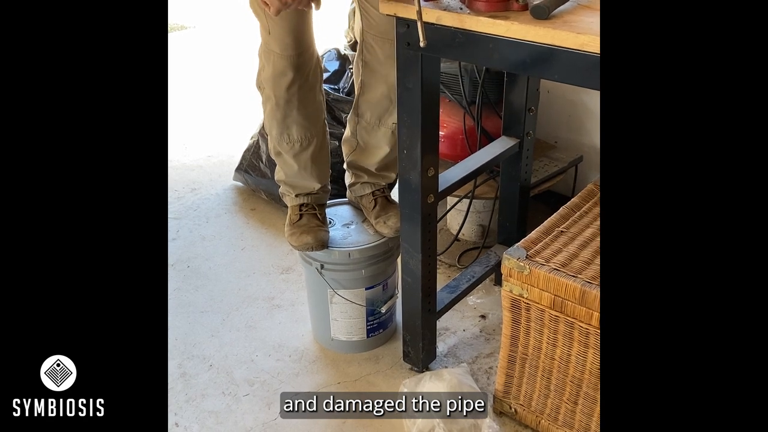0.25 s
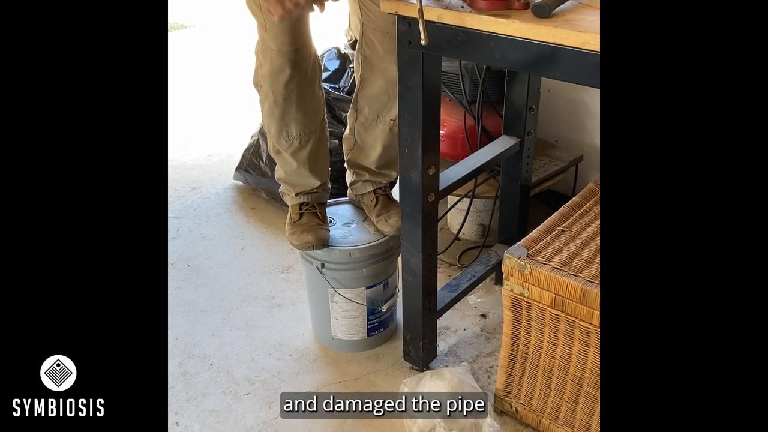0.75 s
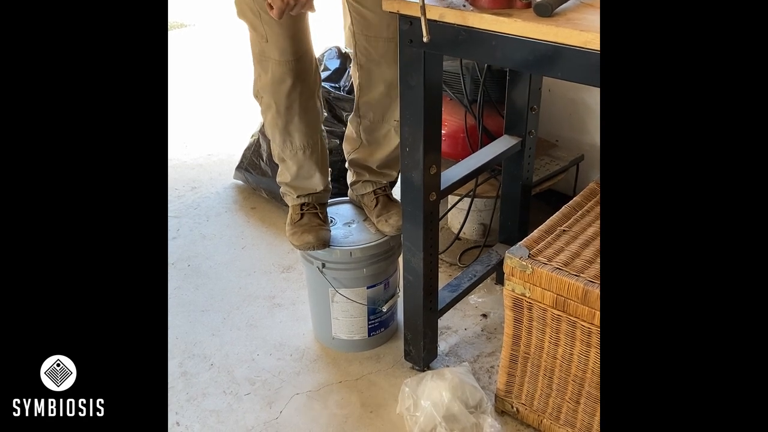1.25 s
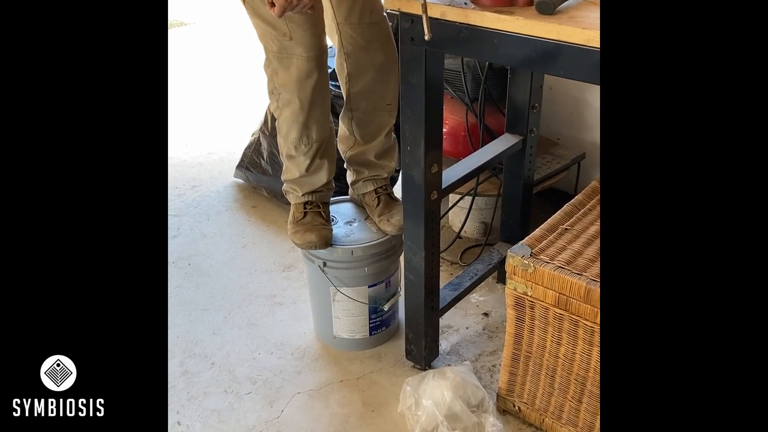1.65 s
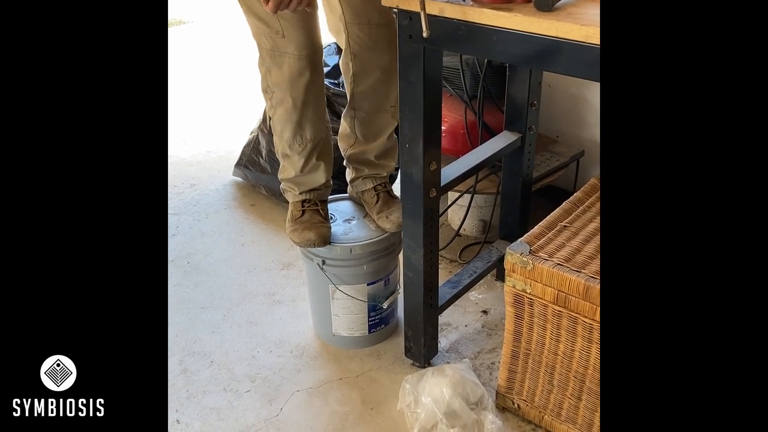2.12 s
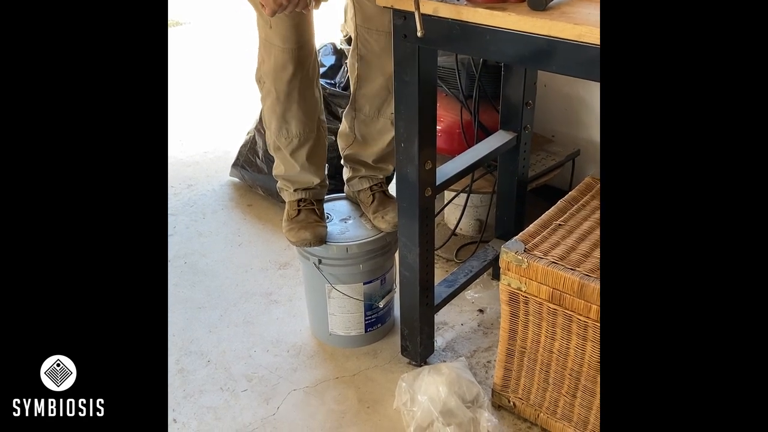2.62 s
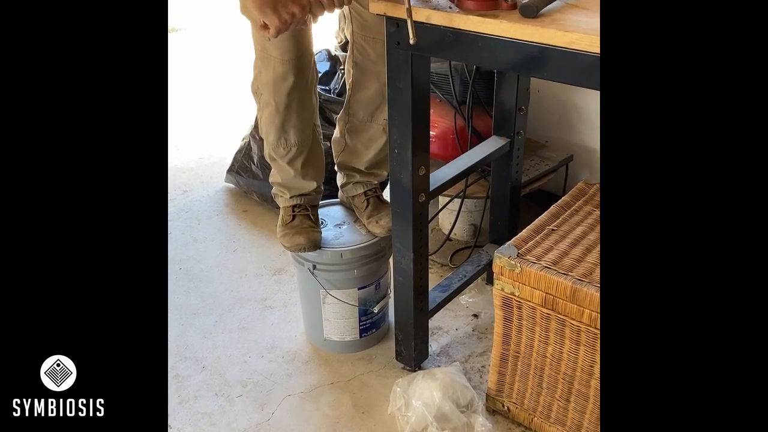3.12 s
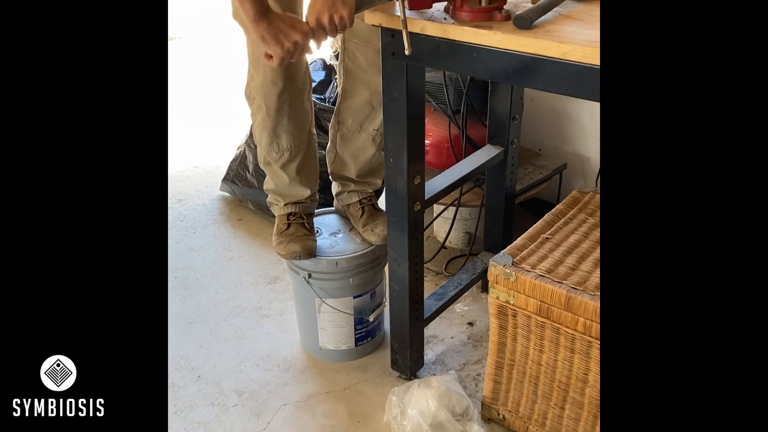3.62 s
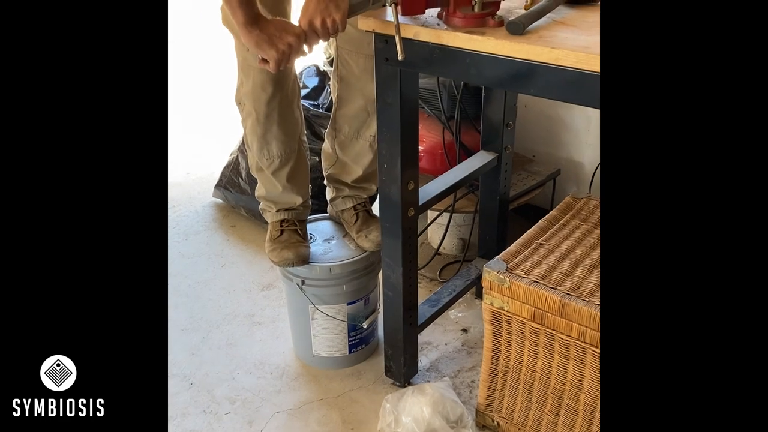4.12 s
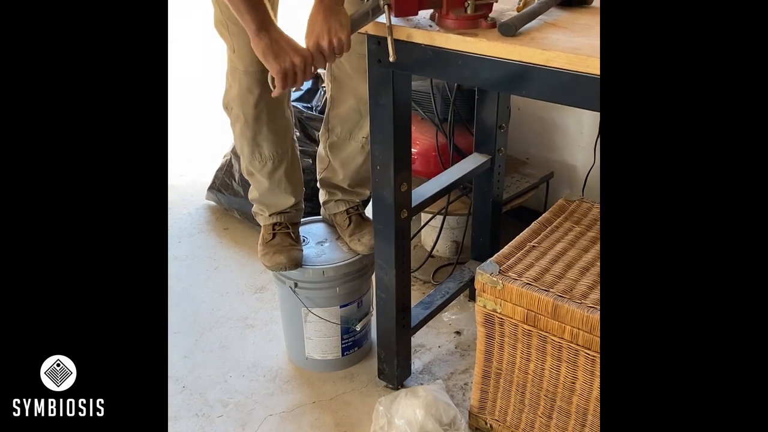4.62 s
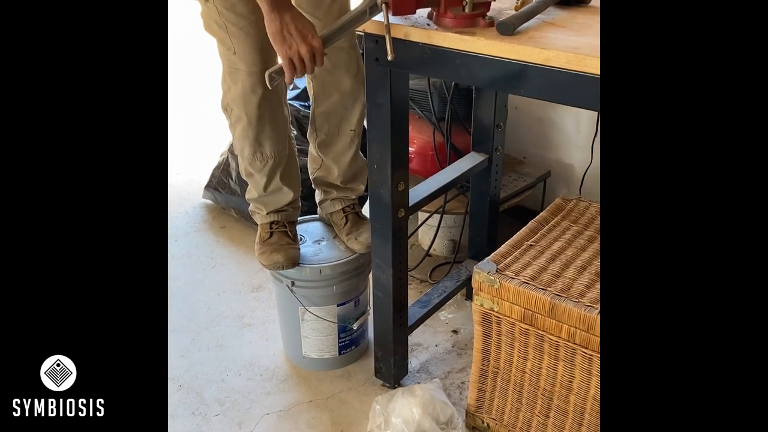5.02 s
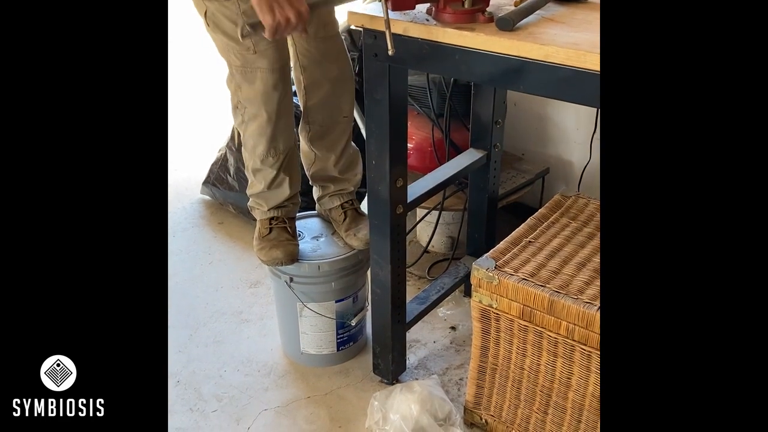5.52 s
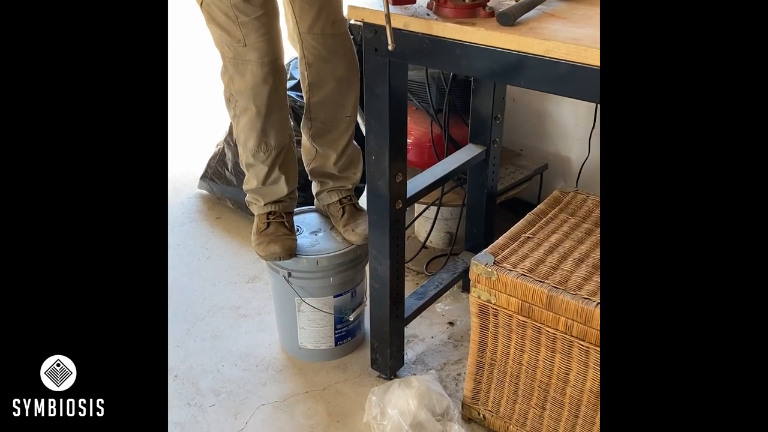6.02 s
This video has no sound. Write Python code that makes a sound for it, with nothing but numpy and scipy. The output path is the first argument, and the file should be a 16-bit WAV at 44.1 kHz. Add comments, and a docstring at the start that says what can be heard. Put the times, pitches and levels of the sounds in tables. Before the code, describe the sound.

A long wrench strains steel pipe fittings clamped to a workbench in a hard-walled garage, heard by a nearby two-microphone phone. From 0.1 s come soft knocks and rattles, growing to sharper clanks at 0.8 and 1.0 s with dull bench thuds. After 1.2 s a scrape fades into near quiet, just hiss and sparse thin high pings. A loose fitting clinks lightly at 2.3 s. Knocks return from 2.7 s, a firm one at 2.95, with gritty scraping around 3.15 and 3.7 s. At 4.3 s one hard, bright bang with a bench thud dominates, followed by a strong clank at 4.5 and heavy scraping, ticking and rumble around 4.7 s. It eases near 5 s; a loud rattling double knock hits at 5.42 s. Smaller knocks, a scrape and a high ping follow; three tiny steel chinks end it around 6.2 s. Tails are short and roomy.

```python
"""In a hard-walled garage a long wrench strains steel pipe fittings clamped to a workbench.
Each slip knocks and rattles the steel: noise under a crack and a lumpy fade, and steel modes rung by it.
The bench thuds from pushes and rough force on its modes; snaps, pings, chinks and a clink are dying sines.
The strain makes patchy scraping, rumble and small ticks, over hiss; sparse taps give the room's tail,
and a phone with two microphones listens."""
import sys
import numpy as np
from scipy import signal
from scipy.fft import rfft, irfft
from scipy.io import wavfile
from scipy.ndimage import uniform_filter1d

SR = 44100
rng = np.random.default_rng(int(sys.argv[2]) if len(sys.argv) > 2 else 0)


def dump(signal):
    """Clip the signal to [-1, 1] and save it as 16-bit WAV at the path in sys.argv[1]."""
    limited = np.clip(np.atleast_2d(signal).T, -1, 1)
    pcm = np.round(limited * 32767).astype(np.int16)
    wavfile.write(sys.argv[1], SR, pcm)


def ratio(d):
    """dB to gain"""
    e = np.asarray(d, float) / 20
    return 10 ** e


N = 275756  # length in samples


def evened(x):
    """Scales to rms 1."""
    return x / np.sqrt(np.mean(x ** 2) + 1e-20)


def read(points, hz):
    """Joins points on a log-frequency axis."""
    f, value = np.transpose(points)
    return np.interp(np.log(hz + 1), np.log(f + 1), value)


def add(mix, s, sound):
    """Mixes a sound in at time s, cut off at the end of the mix."""
    part = mix[..., round(s * SR):][..., :sound.shape[-1]]
    part += sound[..., :part.shape[-1]]


def coloured(x, points):
    """Gives x a spectrum."""
    gain = ratio(read(points, np.fft.rfftfreq(x.shape[-1], 1 / SR)))
    return irfft(rfft(x) * gain, x.shape[-1])


def smoothed(x, size):
    """Runs a moving average twice along the last axis."""
    return uniform_filter1d(uniform_filter1d(x, size), size)


def ring(modes, seconds):
    """The sum of dying sines; modes are (f/Hz, level/dB, t60/s)."""
    t = np.arange(round(seconds * SR)) / SR
    return sum(ratio(db - 60 * t / t60) * np.sin(2 * np.pi * hz * t) for hz, db, t60 in modes)


# spectrum of the chatter: [f/Hz, relative level/dB per Hz]
CHATTER_COLOUR = [(120, -29), (200, 2.5), (323, -35.5), (513, -9), (728, -4), (1050, -4.5), (1130, -9.5),
                  (1550, -10), (4450, -27), (5450, -30.5), (5980, -22), (10600, -18), (11600, -34.5),
                  (15600, -27.5), (16500, -54)]
# the strength, body, edge and rattle bands of a knock: [low f/Hz, high f/Hz]
BAND_EDGES = [(700, 2500), (300, 700), (2500, 6000), (6000, 20000)]


def chatter():
    """Unit drive in four bands, and the uneven pressure with which loose parts touch again and again."""
    impacts = rng.standard_normal(N) * ratio(2.0 * np.minimum(rng.exponential(1, N), 4))
    plain = coloured(impacts, CHATTER_COLOUR)
    bands = [signal.butter(2, edge, "band", fs=SR, output="sos") for edge in BAND_EDGES]
    drives = [evened(signal.sosfilt(band, plain)) for band in bands]
    lumps = smoothed(rng.standard_normal((5, N)), 250)
    touch = ratio(3.5 * evened(lumps[:4] + .8 * lumps[4]))  # the fifth lump is common to all bands
    return drives, evened(impacts), bands, evened(touch)


# slips: [t/s, strength level/dB in 0.7-2.5 kHz, body level/dB over it in 0.3-0.7 kHz,
# rattle level/dB over it above 6 kHz, chatter t60/s before the band's own factor]
KNOCKS = [(0.096, -54.5, 3, -7.5, 0.19), (0.162, -55.5, 14, -28, 0.066), (0.219, -32.5, -13, -8.5, 0.086),
          (0.354, -32.5, -9, -27, 0.14), (0.409, -47, -1, -7, 0.34), (0.723, -45, -3, -0.5, 0.075),
          (0.744, -38.5, -1.5, -9, 0.26), (0.799, -28.5, -9, -5.5, 0.045), (1.008, -21, -16.5, -7.5, 0.094),
          (1.059, -39.5, -12, -29, 0.14), (1.146, -40.5, -8, -4, 0.27), (1.185, -33.5, -10.5, -10, 0.088),
          (2.331, -37.5, -3.5, -1, 0.027), (2.725, -40.5, -10.5, -2, 0.3), (2.768, -47, 8.5, -12, 0.14),
          (2.957, -26, -13.5, -20, 0.092), (3.047, -32.5, -13, -10.5, 0.075), (3.109, -46, -8, -2.5, 0.18),
          (3.357, -46, -5.5, -41, 0.12), (3.39, -40, 3, -10.5, 0.15), (3.556, -34.5, -15.5, 0, 0.067),
          (3.644, -28, -21, -7.5, 0.14), (3.7, -45, -23, -24, 0.11), (3.807, -37.5, -2.5, -9, 0.12),
          (3.901, -43, -12, -16, 0.035), (4.084, -45, -12, -54, 0.056), (4.248, -35, -4, -10, 0.31),
          (4.313, -3.5, 0.5, -12, 0.053), (4.393, -35, -7, 11, 0.12), (4.494, -19, -5.5, -15, 0.083),
          (4.547, -28.5, -18.5, -8.5, 0.029), (4.661, -25, -10.5, -22.5, 0.069),
          (4.778, -30, -8, -6.5, 0.092), (4.847, -30, -24.5, -33, 0.074), (5.156, -49.5, -10, -12.5, 0.17),
          (5.249, -48.5, -7.5, -29.5, 0.11), (5.389, -40.5, -3.5, -8, 0.15), (5.411, -30, 0, 0.5, 0.073),
          (5.418, -17, 0, 2.5, 0.087), (5.483, -28, -14, -1, 0.025), (5.493, -34.5, 5, 9.5, 0.058),
          (5.667, -37.5, 2.5, -4, 0.11), (5.783, -39, -22, -22, .08), (5.841, -51.5, 4.5, -27, 0.35),
          (5.959, -27.5, 2, -15, 0.13)]
# modes of pipe, wrench and vice: [f/Hz, nominal width/Hz, level/dB]
STEEL = [(364, 110, 4), (412.3, 54, -18.5), (478, 55, -1), (637, 55, -4), (809, 20, -10), (849, 50, 6),
         (1051, 35, 2.5), (1211, 31, -3.5), (1400, 50, -2), (1596, 46, 4), (1720, 55, -4), (1941, 26, -7),
         (2354, 60, -2.5), (2672, 58, -6), (3012, 30, -2.5), (3347, 23, 1.5), (3556, 61, -9.5),
         (4470, 29, -4), (4893, 53, -6.5), (5094, 69, -9.5), (6900, 53, -3), (7680, 56, 4.5),
         (8350, 61, -1), (8290, 50, -21), (8760, 70, -0.5), (9000, 180, 0), (10564, 17, -3.5)]
# how each band answers: [rise/s, crack level/dB over the chatter, crack t60/s,
# ring level/dB over the force, factor on the chatter t60]
BANDS = [(0.0046, -12, 0.018, 0, 1.108), (0.011, -7.5, 0.039, 1, 1.25), (0.0035, 4, 0.016, -3, 0.88),
         (0.0025, 6.5, 0.031, -7.5, 0.65)]


def knocks():
    """Each slip is a crack and a dying, lumpy chatter that strikes the steel at its own spot."""
    drives, impacts, bands, touch = chatter()
    t, out = np.arange(SR // 3) / SR, np.zeros(N)
    edge_db, edge_share = -4, 0.4  # 2.5-6 kHz lies under the strength and takes this share of the rattle
    spread_db, detune, least_hz = 3.5, 0.021, 95  # least_hz: no mode is narrower
    spots = rng.standard_normal((len(KNOCKS), 2, len(STEEL)))
    for (s, db, body_db, rattle_db, t60), (weight, shift) in zip(KNOCKS, spots):
        levels_db = db + np.array([0, body_db, edge_db + edge_share * rattle_db, rattle_db])
        # the spot and the grip of the hand weight and detune the modes
        modes = [(hz * (1 + detune * d), mode_db + spread_db * w, 2.16 / max(width, least_hz))
                 for (hz, width, mode_db), w, d in zip(STEEL, weight, shift)]
        steel = ring(modes, .2)
        start = round(s * SR) - 30
        here = slice(start, start + len(t))
        u = t[:len(impacts[here])]
        for k, (rise_s, crack_db, crack_t60, ring_db, stretch) in enumerate(BANDS):
            smooth = ratio(-60 * u / (t60 * stretch))
            lumpy = touch[k][here] * smooth
            lumpy *= np.linalg.norm(smooth) / np.linalg.norm(lumpy)  # same energy, unevenly spent
            fall = ratio(crack_db - 60 * u / crack_t60) + lumpy
            force = ratio(levels_db[k]) * fall * (1 - np.exp(-u / rise_s))
            rung = signal.fftconvolve(force * impacts[here], signal.sosfilt(bands[k], steel))
            add(out, start / SR, force * drives[k][here])
            add(out, start / SR, ratio(ring_db) * np.linalg.norm(force) * rung / np.linalg.norm(rung))
    return out


# short pitched snaps within some knocks: [t/s, level/dB before the soft onset, f/Hz]
SNAPS = [(0.217, -30, 1070), (0.36, -27, 878), (0.726, -27, 848), (1.005, -19.5, 950), (2.961, -25, 960),
         (3.645, -23, 1225), (4.312, -13.5, 1027), (4.313, -10.5, 2045), (4.395, -22.5, 5400),
         (4.493, -18, 1050), (4.666, -19.5, 1400), (4.848, -26, 874), (5.421, -12.5, 1380),
         (5.422, -17, 5405)]


def snaps():
    """Single dying sines with a soft onset; higher pitches die sooner."""
    out = np.zeros(N)
    seconds = (SR // 3) / SR
    rise = 1 - np.exp(-np.arange(SR // 3) / SR / 0.0011)
    for s, db, hz in SNAPS:
        t60 = 0.04 * (1000 / hz) ** 0.4  # 0.04 s at 1 kHz
        add(out, s - .001, rise * ring([(hz, db, t60)], seconds))
    return out


# the long pipe's hum: [f/Hz, level/dB, t60/s]
PIPE = [(637, -74, 1.6)]


def pipe_hum(hits):
    """The long pipe hums on faintly, a slow mode rung by the hits."""
    return signal.oaconvolve(hits, ring(PIPE, 1.5))[:N]


# bench thuds: [t/s, relative top level/dB in 130-300 Hz, legs level/dB over it in 50-130 Hz]
THUDS = [(0.118, -55, -22), (0.155, -34, -12), (0.308, -44.5, -22), (0.373, -40.5, 2), (0.467, -40, -14.5),
         (0.748, -32, -7), (0.888, -43, -20.5), (1.016, -31, -1.5), (1.137, -40, 2.5), (1.248, -46.5, 1),
         (2.336, -59, -19), (2.768, -35.5, -6), (2.967, -40, 4), (3.085, -45, 4), (3.391, -33.5, -7),
         (3.656, -42, 9), (3.794, -36.5, 7), (3.848, -42, 1.5), (4.264, -32.5, -15), (4.312, -16, -8.5),
         (4.488, -32.5, 5), (4.541, -38, -2.5), (4.672, -34.5, -1.5), (4.748, -37.5, 8), (4.864, -39, -2.5),
         (5.159, -56, -22), (5.429, -19, -9), (5.501, -30.5, -9), (5.681, -35, -30), (5.78, -42, -10),
         (5.9, -43, -26), (5.965, -40.5, -21)]
# bench modes, first two the legs, the rest the top: [f/Hz, level/dB, t60/s before the slow swell]
BENCH = [(76.5, -3.5, 0.062), (88.6, -7, 0.16), (148.4, -4, 0.049), (193.6, 9, 0.045), (245, -10.5, 0.049),
         (295, -2.5, 0.064)]


def thuds():
    """The bench shakes after a knock: a push and a burst of rough force ring its top and its legs."""
    t, (force, blows) = np.arange(SR // 2) / SR, np.zeros((2, 2, N))
    push = np.hanning(round(0.0027 * SR))  # 2.7 ms
    push_db, rough_db = np.array([[-11], [-16]]), -0.5  # push on top and legs; rough force
    shake = ratio(-60 * t / 0.13) * (1 - np.exp(-t / 0.0065))
    for s, db, legs_db in THUDS:
        both_db = db + np.array([[0], [legs_db]])
        add(force, s - .006, ratio(both_db) * shake)
        add(blows, s, ratio(push_db + both_db) * push)
    soft = signal.butter(2, 420, fs=SR, output="sos")
    bodies = signal.sosfilt(soft, [ring(BENCH[2:], .4), ring(BENCH[:2], .4)])
    bodies *= (1 - np.exp(-t[:bodies.shape[1]] / 0.0054)) ** 2  # the heavy bench is slow to answer
    bodies /= np.linalg.norm(bodies, axis=1, keepdims=True)
    drive = blows + ratio(rough_db) * force * rng.standard_normal((2, N))
    return ratio(3.0) * signal.oaconvolve(drive, bodies, axes=1)[:, :N].sum(0)


def onset():
    """A 0.4 s gain that rises softly with a 1 ms time constant."""
    return 1 - np.exp(-np.arange(round(.4 * SR)) / SR / .001)


# high pings: [t/s, level/dB before the soft onset, f/Hz]
PINGS = [(0.029, -40, 15600), (0.223, -50, 15600), (0.411, -46, 15400), (0.519, -40, 15670),
         (0.693, -41, 15770), (0.798, -42, 14800), (1.302, -43, 15200), (1.73, -47.5, 15800),
         (2.331, -49, 15500), (2.485, -43.5, 15940), (2.725, -39, 15100), (2.806, -45, 15700),
         (2.907, -33.5, 15800), (3.132, -48, 15600), (3.282, -33, 15800), (3.555, -43, 14900),
         (3.673, -49, 15400), (3.805, -37, 15850), (4.016, -38, 15800), (4.19, -38.5, 15700),
         (4.298, -41, 16000), (4.393, -49, 15000), (4.684, -41, 15700), (4.909, -38, 15400),
         (5.083, -35, 15470), (5.396, -39, 15900), (5.494, -40, 15200), (5.711, -23, 16000)]


def pings():
    """Thin high pings, each a single dying sine."""
    out = np.zeros(N)
    for s, db, hz in PINGS:
        add(out, s, onset() * ring([(hz, db, 0.16)], .4))
    return out


# a small steel piece chinks at the end: [t/s, level/dB over its modes]
CHINKS = [(6.184, -50), (6.216, -51.5), (6.243, -52)]
# modes of the piece: [f/Hz, level/dB, t60/s]
PIECE = [(4220, -3, 0.09), (4300, -0.5, 0.13), (6050, -11.5, 0.097), (8020, -0.5, 0.075)]


def chinks():
    """A small piece rings with the same modes at every chink."""
    out = np.zeros(N)
    for s, db in CHINKS:
        add(out, s, ratio(db) * onset() * ring(PIECE, .4))
    return out


# a loose fitting is touched: one [t/s, level/dB over its modes], then its modes [f/Hz, level/dB, t60/s]
CLINK = (2.333, -38.5), [(1120, -4, 0.2), (1700, -2.5, 0.1), (3359, -21.5, 0.32), (3630, -7, 0.12),
         (3774, -9.5, 0.13), (4300, -11, 0.13), (4581, -28, 0.2), (5800, -41.5, 0.44), (8650, -36, 0.63)]


def clink():
    """One clink of a loose fitting, its modes wobbling as it rocks on its thread."""
    out = np.zeros(N)
    (s, db), modes = CLINK
    soft = onset()
    wobble = ratio(6.0 * evened(uniform_filter1d(rng.standard_normal(len(soft)), 300)))
    add(out, s, ratio(db) * soft * wobble * ring(modes, .4))
    return out


# pull on the wrench: [t/s, scrape level/dB, rumble level/dB]
STRAIN = [(0.0, -75.5, -68.5), (0.26, -62, -56), (0.62, -65.5, -59.5), (1.169, -52.5, -57.5),
          (1.45, -58.5, -66), (1.779, -80.5, -69), (2.08, -91.5, -67.5), (2.172, -65, -61.5),
          (2.661, -97.5, -64), (2.8, -71.5, -63.5), (3.15, -51, -59), (3.322, -68.5, -62),
          (3.69, -46.5, -48.5), (4.221, -69.5, -64), (4.44, -60.5, -51.5), (4.7, -39.5, -41.5),
          (5.0, -57, -65), (5.38, -69.5, -62), (5.61, -49, -61.5), (6.25, -66, -65)]
# spectra of scrape and rumble: [f/Hz, relative level/dB per Hz]
SCRAPE = [(150, -34.5), (250, 0), (522, -5.5), (768, 1.5), (1440, -1.5), (2620, -16.5), (4590, -19.5),
          (5470, -62), (6520, -15.5), (9090, -17), (11400, -39), (15700, -9), (16500, -12)]
RUMBLE = [(12, -64), (20, -48.5), (53, -2), (70, -2), (114, -15), (129, -27), (400, -24.5), (520, -66),
          (880, -120)]


def strain():
    """Patchy scraping, its resonances shifting, and a rumble follow the pull on the wrench."""
    s, scrape_db, rumble_db = np.transpose(STRAIN)
    t = np.arange(N) / SR
    z = signal.stft(coloured(rng.standard_normal((2, N)), SCRAPE), nperseg=512)[2]
    # patches are smooth over pitch and time, jolts move all pitches together
    patches = uniform_filter1d(uniform_filter1d(rng.standard_normal(z.shape[1:]), 4, 0), 5, 1)
    jolts = uniform_filter1d(rng.standard_normal(z.shape[2]), 3)
    z = z * ratio(6.9 * evened(patches) + 2.0 * evened(jolts))
    scrape = evened(signal.istft(z, nperseg=512)[1][:, :N])
    rumble = evened(coloured(rng.standard_normal((2, N)), RUMBLE))
    return scrape * ratio(np.interp(t, s, scrape_db)) + rumble * ratio(np.interp(t, s, rumble_db))


def ticks():
    """Loose parts tap the steel at random, as puffs and rung modes that follow the scrape's level."""
    s, scrape_db, _ = np.transpose(STRAIN)
    per_s, under_db, t60 = 60, -4, 0.03  # taps/s, dB relative to the scrape, s
    taps = (rng.random(N) < per_s / SR) * ratio(4.6 * np.minimum(rng.exponential(1, N), 3))
    u = np.arange(SR // 10) / SR
    fade = ratio(-60 * u / t60) * (1 - np.exp(-u / .003))
    puffs = coloured(signal.oaconvolve(taps, fade)[:N] * rng.standard_normal(N), CHATTER_COLOUR)
    rung = signal.oaconvolve(taps, ring([(hz, db, t60) for hz, _, db in STEEL], .1))[:N]
    both = evened(evened(puffs) + 0.92 * evened(rung))
    return both * ratio(under_db + np.interp(np.arange(N) / SR, s, scrape_db))


# reverberation of the hard walls: [f/Hz, t60/s]
GARAGE = [(60, 1), (200, 0.31), (700, 0.37), (2000, 0.51), (5000, 0.5), (10000, 0.33), (16000, 0.12)]


def garage(x):
    """Two unrelated tails of sparse taps, each band dying at its own speed."""
    at = np.arange(130, SR - 20, 20)
    taps = np.zeros((2, SR))
    places = at + rng.integers(0, 20, (2, len(at)))
    np.put_along_axis(taps, places, rng.choice([-1., 1.], (2, len(at))), 1)
    hz, t, z = signal.stft(taps, SR, nperseg=512)
    t60 = read(GARAGE, hz)[:, None]
    tail = signal.istft(z * ratio(-60 * t / t60) / np.sqrt(t60), SR, nperseg=512)[1]
    return signal.fftconvolve(x[None], tail / np.linalg.norm(tail[0]), axes=1)[:, :N]


# spectrum of the hiss: [f/Hz, relative level/dB per Hz]
AIR = [(88, -39), (150, -5), (814, -29.5), (1620, -23.5), (4970, -38.5), (8790, -20.5), (11800, -33.5),
       (15300, -19), (16500, -27.5)]


def air():
    """Steadily coloured noise, a hiss that slowly swells and sinks."""
    hiss = ratio(-74.5) * evened(coloured(rng.standard_normal((2, N)), AIR))
    return hiss * ratio(2.5 * evened(smoothed(rng.standard_normal(N), 6000)))


def scene():
    """Row 0 is what both microphones share, row 1 what differs between them."""
    struck = knocks() + snaps()
    hits = struck + pipe_hum(struck) + ticks()
    lows = thuds()
    highs = pings() + chinks() + clink()
    wet = garage(ratio(-3.5) * hits + ratio(-6) * lows + ratio(-18) * highs) + strain() + air()
    wet[0] += hits + lows + highs
    return wet


def band_limit(x):
    """A steep low-pass at the top of the band."""
    return signal.sosfilt(signal.butter(12, 17160, fs=SR, output="sos"), x)


# overall colour of the whole sound, with a hole at 11-12 kHz: [f/Hz, level/dB]
OVERALL_COLOUR = [(40, -11), (100, 1.5), (350, -1.5), (800, 0), (1800, 3), (3500, 8), (5500, 9), (9000, 0),
                  (10900, 11.5), (11300, -16), (12200, -8), (12600, 1.5), (15850, -3), (16100, -31)]
# likeness of the ports when both rows are equally loud: [f/Hz, correlation 0-1]
SAME = [(60, 0.9), (200, 0.95), (500, 0.5), (1400, 0.44), (3000, 0.3), (6000, 0.82), (10000, 1), (15000, 1)]
# phase by which the left port leads: [f/Hz, phase/rad]
LEAD = [(0, 0), (200, 0), (600, -1.17), (1720, -1.14), (2670, 4), (5860, 4), (7750, 4.5), (11100, 11),
        (14000, 14), (16700, 12.5)]
# balance, left over right: [f/Hz, level/dB]
TILT = [(60, 1), (180, 0.5), (550, 1), (1650, -1.5), (4970, 0), (15000, 0.5)]


def record(dry):
    """Overall colour, then two microphone ports, alike by band, apart in phase and balance; soft overload."""
    hz = np.fft.rfftfreq(N, 1 / SR)
    shared, differing = rfft(dry) * ratio(read(OVERALL_COLOUR, hz))
    apart = np.arccos(np.clip(read(SAME, hz), 0, 1)) / 2
    # half the balance and phase goes to each port
    turn = ratio(read(TILT, hz) / 2) * np.exp(.5j * np.interp(hz, *np.transpose(LEAD)))
    left = np.cos(apart) * shared + np.sin(apart) * differing
    right = np.cos(apart) * shared - np.sin(apart) * differing
    ports = irfft(np.array([left * turn, right / turn]), N)
    mix = 1.156 * np.tanh(ports / 1.254)
    return band_limit(mix)


dry = scene()
out = record(dry)
dump(out)
```